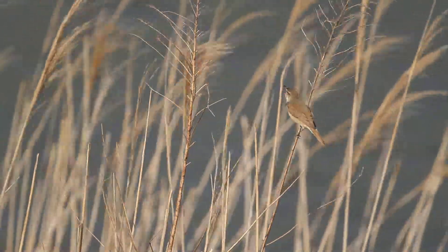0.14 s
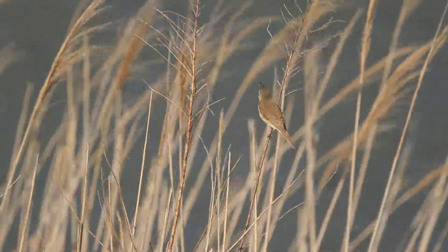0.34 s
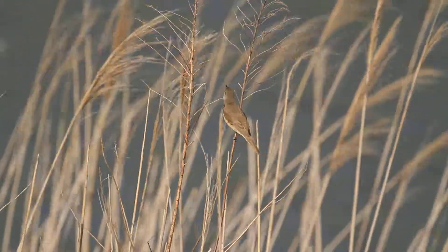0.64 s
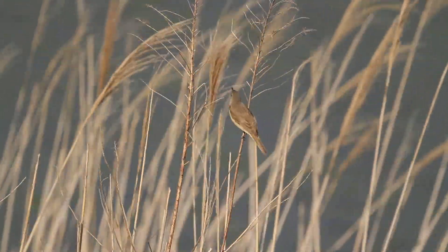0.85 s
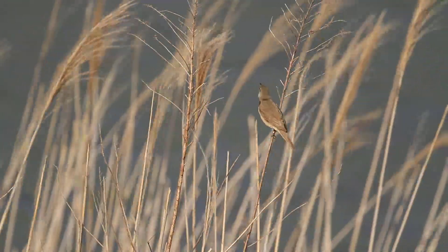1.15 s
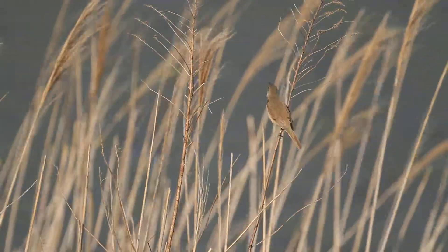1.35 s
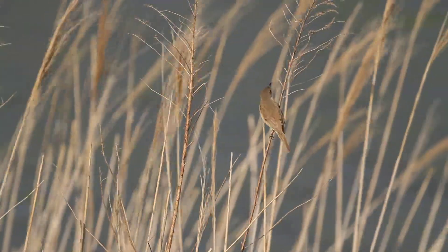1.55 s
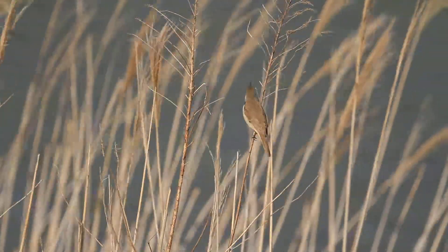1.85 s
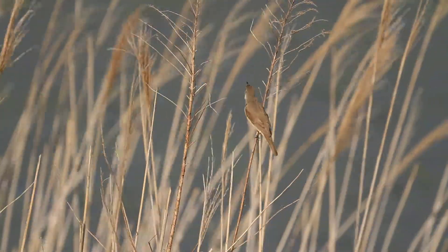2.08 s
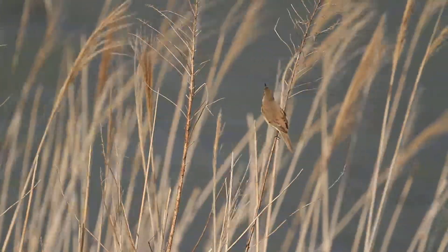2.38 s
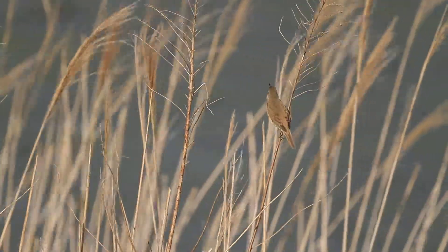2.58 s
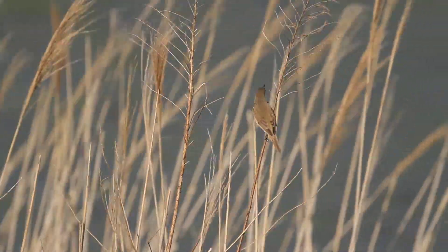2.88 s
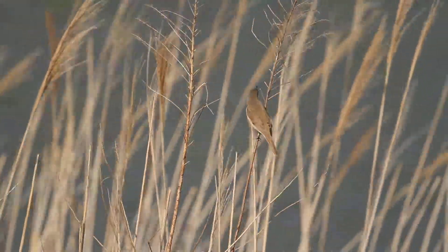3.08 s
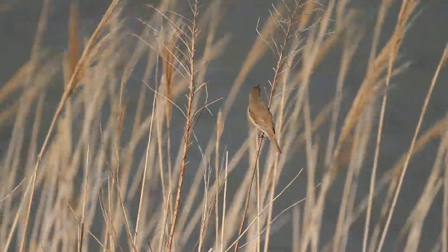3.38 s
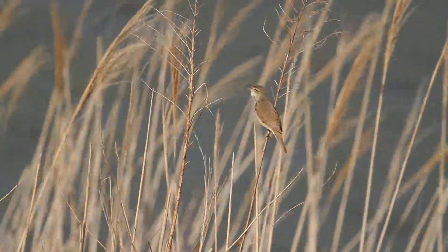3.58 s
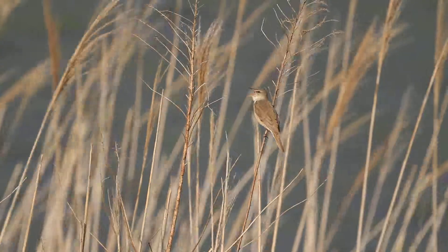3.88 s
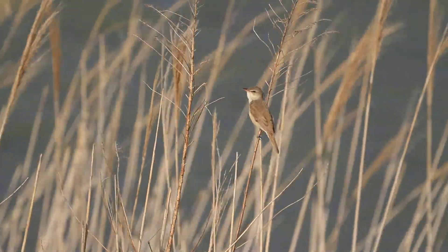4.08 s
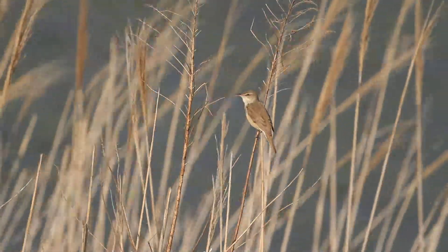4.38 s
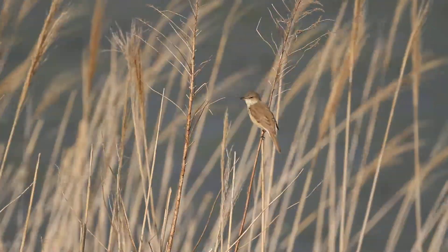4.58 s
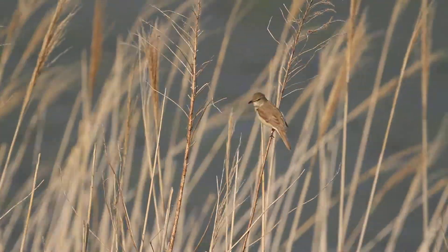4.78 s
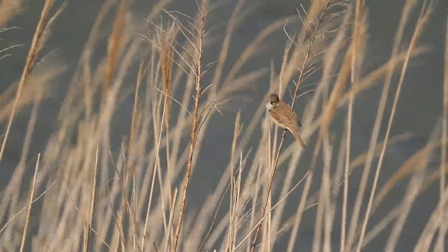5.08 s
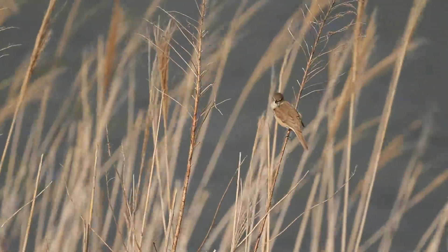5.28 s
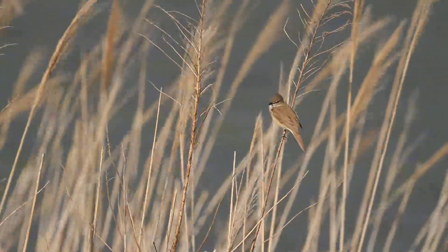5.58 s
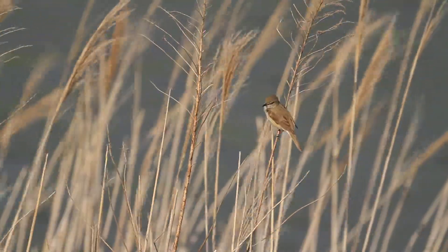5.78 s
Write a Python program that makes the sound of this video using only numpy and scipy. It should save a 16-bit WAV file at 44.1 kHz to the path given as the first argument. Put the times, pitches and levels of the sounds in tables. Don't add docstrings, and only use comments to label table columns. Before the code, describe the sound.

A reed warbler sings six quick phrases of harsh churrs, squeaky trills and rattling buzzes, then pauses as fainter birds call over soft wind.

```python
import sys
import numpy as np
from scipy import signal
from scipy.fft import rfft, irfft
from scipy.io import wavfile
from scipy.ndimage import uniform_filter1d

SR = 44100
rng = np.random.default_rng(int(sys.argv[2]) if len(sys.argv) > 2 else 0)


def volts(x):
    e = np.asarray(x, float) / 20
    return 10 ** e


def wrap_up_sound(samples):
    columns = np.atleast_2d(samples).T
    tamed = np.clip(columns, -1, 1)
    steps = np.round(tamed * 32767).astype(np.int16)
    wavfile.write(sys.argv[1], SR, steps)


N = 261954
T = np.arange(N) / SR

# start_s [s, of the throbbing half], level_db [dB], distance_blur [0-1]
CHURS = [(0.0241, -25.5, 0.14), (0.541, -24, 0), (0.673, -24.5, 0.05), (1.2252, -23.5, 0),
         (1.358, -23.5, 0.08), (1.9837, -23.5, 0), (2.1159, -21.5, 0.04), (2.7305, -23.5, 0),
         (2.8791, -23.5, 0.07), (3.5211, -24, 0.1), (3.6622, -25, 0), (3.392, -46.5, 0.1),
         (4.608, -46.5, 0.2), (4.721, -45, 0.2), (4.843, -45, 0), (5.633, -38.5, 0.2), (5.76, -40.5, 0.55),
         (5.892, -42.5, 0.56)]
# frequency_hz [Hz], gain_db [dB]
CHUR_THROAT = [(530, -64), (900, -31), (1130, -22.5), (1470, -29), (2070, -7.5), (2250, -4), (2360, 1.5),
               (2820, -2), (5440, -41.5), (7150, -34.5), (8550, -107), (9180, -40), (10700, -61.5),
               (12200, -31), (15500, -102)]
# first_high_turn_s [s], first_pitch_hz [Hz], last_pitch_hz [Hz], swing_hz [Hz], level_db [dB]
TRILLS = [
    (.1225, 5800, 6730, 850, -35),
    (.7735, 7360, 6180, 520, -36.5),
    (1.469, 6500, 6370, 460, -35.5),
    (2.2205, 6600, 6040, 630, -37.5),
    (2.9841, 5770, 6370, 800, -32.5),
    (3.779, 6670, 6340, 705, -40),
]
# start_s [s], end_s [s], level_db [dB]
RATTLES = [(.212, .246, -27), (.25, .278, -28.5), (.877, .922, -29.5), (.93, .955, -48),
           (1.568, 1.608, -30), (1.61, 1.638, -28.5), (2.327, 2.362, -32.5), (2.366, 2.397, -32),
           (3.094, 3.123, -29.5), (3.127, 3.164, -35), (3.905, 3.975, -36.5)]
# frequency_hz [Hz], gain_db [dB]
RATTLE_THROAT = [(1180, -77), (2000, -18), (2330, -20), (2770, -8.5), (2940, -9), (3580, 5), (4070, -3),
                 (5130, -4), (6750, -36), (9590, -34), (10800, -30.5), (15500, -50)]
# loudest_s [s], level_db [dB], lead_s [s before], first_beat_hz [Hz], beat_drop_s [s before]
BUZZES = [
    (0.341, -13.5, 0.066, 367.4, .031),
    (1.005, -15, 0.062, 354, 0.021),
    (1.7, -12.5, 0.064, 353.4, 0.017),
    (2.459, -14.5, 0.061, 290, 0.077),
    (3.229, -18, 0.0674, 358, 0.042),
    (4.062, -17.5, 0.081, 430, .037),
]
# top_hz [Hz], crest [share of the swell], stop_s [s after the loudest]
BUZZ_ARCHES = [(4400, .6, .008), (4350, .7, .013), (4370, .42, .006), (4340, .8, .014), (4270, .5, .011),
               (4250, .5, .005)]
# frequency_hz [Hz], gain_db [dB]
BUZZ_THROAT = [(940, -76), (1600, -36), (2190, -12), (2450, -16), (2780, -30), (3520, 1), (4380, 5),
               (4730, -13), (5880, -12.5), (6650, -23), (7110, -32), (9460, -37), (10600, -33),
               (13300, -40), (15500, -52)]
# time_s [s], overtone_gain_db [dB]
FACING = [(0, 5), (2.1, 5), (3, 10), (3.6, 3), (4.05, 10.5), (4.3, 0), (5.94, -8.5)]
# frequency_hz [Hz], gain_db [dB]
SCATTER_TREBLE = [(6500, 0), (10000, 10)]
# start_s [s], end_s [s], level_db [dB]
RASPS = [(5.06, 5.066, -43), (5.07, 5.104, -38.5), (5.117, 5.158, -41.5), (5.25, 5.296, -40),
         (5.313, 5.352, -37), (5.38, 5.43, -48), (5.53, 5.6, -53)]
# frequency_hz [Hz], gain_db [dB]
RASP_THROAT = [(1470, -43), (2500, -15), (2890, -16), (3270, -5), (3950, -8.5), (4530, -2.5), (4800, -4.5),
               (5240, -11), (6360, -23), (8000, -36), (10400, -56), (17600, -120)]
# start_s [s], length_s [s], middle_pitch_hz [Hz], glide_hz [Hz], level_db [dB]
WHISTLES = [
    (4.112, 0.12, 2905, 215, -37),
    (4.37, .12, 2853, 275, -47.5),
    (5.497, 0.061, 2770, -120, -48),
]
# start_s [s], length_s [s], middle_pitch_hz [Hz], glide_hz [Hz], level_db [dB]
HOOTS = [
    (.815, .08, 682, -6, -53),
    (4.6, .1, 702, -53, -61),
    (5.19, .145, 737, 29, -56),
    (5.37, .17, 704, -42, -57.5),
]
# start_s [s], length_s [s], middle_pitch_hz [Hz], glide_hz [Hz], level_db [dB]
HOOT_OVERTONE = [(5.19, .15, 1470, -30, -59)]
# start_s [s], length_s [s], middle_pitch_hz [Hz], glide_hz [Hz], level_db [dB]
FAR_WHISTLES = [(4.61, .048, 4830, 0, -54), (4.655, .05, 4000, -1500, -55), (4.765, .03, 3550, -420, -53),
                (4.805, .02, 3850, -370, -55), (4.83, .018, 4560, 20, -56), (4.855, .07, 4720, 80, -53.5),
                (4.93, .025, 5000, 130, -58), (5.13, .045, 6300, -2300, -57), (5.175, .025, 5450, 700, -54),
                (5.065, .045, 7600, 400, -60), (5.14, .06, 2030, 30, -60), (3.81, .065, 4190, -10, -51),
                (3.83, .13, 3590, 0, -50.5), (4.09, .1, 4180, 0, -54)]
# start_s [s], length_s [s], middle_pitch_hz [Hz], glide_hz [Hz], level_db [dB]
HOARSE_NOTES = [(4.955, .04, 5150, -100, -53), (4.258, .027, 2550, -300, -48),
                (4.25, .015, 3500, -100, -53)]
# first_high_turn_s [s], first_pitch_hz [Hz], last_pitch_hz [Hz], swing_hz [Hz], level_db [dB]
FAR_TRILL = [(5.407, 3200, 3000, 130, -46.5)]
# frequency_hz [Hz], density_db [dB per Hz]
REEDS = [(530, -26), (900, -2.5), (1450, -2.5), (1600, -3.5), (1780, -6), (2150, -3), (2610, -7.5),
         (2830, -5.5), (3960, -8.5), (5470, -12), (5740, -14.5), (10200, -17), (15600, -22.5)]
# frequency_hz [Hz], density_db [dB per Hz]
RUMBLE = [(15, -54), (25, -5), (48, -4), (92, -7), (140, 2), (198, -5.5), (263, 0.5), (340, -4.5),
          (413, -1), (533, -10), (677, -3), (900, -10.5), (1170, -56), (1980, -120)]
# start_s [s], decay_s [s], level_db [dB]
RUSTLES = [(0.39, 0.058, -55.5), (0.425, 0.024, -48.5), (0.452, 0.027, -51.5), (5.074, 0.044, -57),
           (5.553, 0.035, -63), (5.632, 0.088, -59)]
# time_s [s], level_db [dB]
HUM = [(0, -63), (1.45, -61), (1.7, -49), (2.4, -55), (3, -62), (5.94, -61)]
# start_s [s], peak_db [dB], wobble_hz [Hz]
THUMPS = [(5.143, -39, 41.5), (5.198, -38.5, 83.5), (5.22, -37, 68), (5.261, -39, 56), (5.301, -38.5, 63),
          (5.347, -46, 71), (5.385, -40.5, 63), (5.535, -42, 95), (5.571, -43, 72)]


def churs():
    out, t, order = np.zeros(N), np.arange(-2200, 2600) / SR, np.arange(-2, 22)[:, None]
    lead_s, gap_s, throb_s, release_s = 0.05, 0.011, 0.044, 0.0087
    lead = fade(t + lead_s, lead_s - gap_s, 0.03, 0.00275)
    gap = volts(-13) * (np.abs(t + gap_s / 2) < gap_s / 2)
    throbbing = volts(1.5) * fade(t + 0.00046, throb_s + release_s, 0.0015, release_s)
    shape = lead + gap + throbbing
    ramp = np.minimum(t, 2 * (throb_s + 0.0017 - t)) / 0.017
    depth = np.where(t < 0, 0.19, 0.92 * np.clip(ramp, .2, 1))
    for start, db, blur in CHURS:
        hz = 2310 + 80 * walk(149.4, size=len(t)) + 125 * walk(900, size=len(t))
        beat_hz = 570 + 90 * walk(200, size=len(t))
        source = two_voices(hz, beat_hz, order, CHUR_THROAT, blur_hz=22)
        throb = np.cos(2 * np.pi * 153.8 * (t - .002) + 0.59 * walk(67, size=len(t)))
        deep = np.clip(depth * (1 - blur), 0, 1)
        level_db = db + 2.04 * walk(400, size=len(t))
        add(out, start + t[0], source * shape * volts(level_db) * (1 - deep * (1 - throb) / 2))
    return out


def trills(table, rate, throat_hz):
    out = np.zeros(N)
    swings, sag, dip = 6.2, .06, 1.1
    for turn, first_hz, last_hz, swing_hz, db in table:
        t = np.arange(-.6 / rate, (swings - .6) / rate, 1 / SR)
        u = np.linspace(0, 1, len(t))
        swing = np.cos(2 * np.pi * rate * t)
        narrow_dips = swing - dip * np.minimum(swing, 0) ** 2
        wide_hz = swing_hz * np.interp(u, [0, .6, 1], [.3, 1, 0])
        path_hz = first_hz + (last_hz - first_hz) * u - sag * throat_hz * np.sin(np.pi * u)
        hz = path_hz + wide_hz * narrow_dips + 60 * walk(500, size=len(t))
        swell_db = np.interp(u, [0, .55, 1], [-4, 0, -9])
        throat_db = -10 * np.log10(1 + ((hz / throat_hz - 1) / .058) ** 2)
        level_db = db + swell_db + 3.5 + throat_db + 2.5 * walk(308, size=len(t))
        note = tone(hz, -36 - throat_db) * volts(level_db)
        add(out, turn + t[0], note * fade(t - t[0], t[-1] - t[0], .004, .005))
    return out


def rattles(table, throat, rate, breath, rise):
    out, t = np.zeros(N), T[:4400]
    for start, end, db in table:
        source = clicks(rate, .17, 2.0, len(t))
        source = source + breath * np.clip(t / 0.066, 0, 1) * rng.standard_normal(len(t))
        length = end - start + 1 / rate
        shape = fade(t, length, rise * length, 0.036 * length)
        add(out, start - 1 / rate, unit(colour(source, throat)) * volts(db) * shape)
    return out


def buzzes():
    out, t = np.zeros(N), np.arange(-4400, 1400) / SR
    overtone, order = (v.reshape(-1, 1) for v in np.mgrid[2:8, -5:2])
    for (peak, db, length, beat_hz, drop), (top_hz, crest, stop) in zip(BUZZES, BUZZ_ARCHES):
        voice_hz = top_hz - 560 * (np.clip(1 + t / length, 0, 1) - crest) ** 2
        throat = np.interp(t, [stop - .012, stop, stop + .012], [1, .94, .8])
        beat = np.interp(t, [-length, -drop - .003, -drop + 0.0015, 0],
                         [1.04 * beat_hz, min(346.6, beat_hz), 308.2, 288])
        rough = np.interp(t, [-length, -.7 * length, -.03, -.005], [1.6, .8, .9, 2.2])
        hz = voice_hz * throat + 10 * walk(300, size=len(t))
        beat = beat + 4 * rough * walk(400, size=len(t))
        weak_db = np.where(order % 2, np.interp(t, [-drop, 0], [-7, -3]), 0)
        swell_s = [-length - .012, -length, -length + 0.0092, -.3 * length, 0, stop, stop + 0.022]
        swell_db = np.interp(t, swell_s, [-29.5, -14.5, -11.0, -5, -3, -4.5, -53])
        push_db = np.where(overtone > 3, .5 * np.maximum(swell_db, -16) + 3, 0)
        blur_hz = 2.4 * rough * (overtone - 1) ** 1.5
        voice = two_voices(hz * overtone / 2, beat, order, BUZZ_THROAT, blur_hz, throat, weak_db + push_db)
        voice = voice + volts(-31.0) * (tone(hz / 2, -40) + tone(hz / 2 - beat, -40))
        level_db = db + swell_db + 0.31 * rough * walk(350, size=len(t))
        add(out, peak + t[0], voice * volts(level_db))
    return out


def two_voices(hz, beat_hz, order, throat, blur_hz, shift=1, extra_db=0):
    wander = np.array([walk(700, size=len(beat_hz)) for _ in order])
    lines_hz = hz + order * beat_hz + blur_hz * np.clip(order ** 2, 1, 50) * wander
    phase = 2 * np.pi * (np.cumsum(lines_hz, axis=1) / SR + rng.random(order.shape))
    gain = uniform_filter1d(gain_at(lines_hz / shift, throat), size=150, axis=1)
    voice = np.sum(gain * volts(extra_db) * np.sin(phase), axis=0)
    return voice / np.sqrt(uniform_filter1d(voice ** 2, size=400))


def facing(song):
    high_pass = signal.butter(4, 7600, "high", fs=SR, output="sos")
    overtones = signal.sosfiltfilt(high_pass, song)
    return song + (volts(np.interp(T, *np.transpose(FACING))) - 1) * overtones


def whistles(table, second_db, flutter_db, shake_hz, arch):
    out = np.zeros(N)
    for start, length, middle_hz, glide_hz, db in table:
        u = np.linspace(-1, 1, int(length * SR))
        hz = middle_hz * (1 - arch * u ** 2) + glide_hz / 2 * u
        level = volts(db + 3.5 * u + flutter_db * walk(150, size=len(u))) * fade(u + 1, 2, .25, .15)
        add(out, start, tone(hz + shake_hz * walk(600, size=len(u)), second_db) * level)
    return out


def space(x):
    t = T[:SR]
    near, late, bank = rng.standard_normal((3, SR))
    near_t60_s, late_t60_s, bank_s, smear_s = .13, .6, .24, .022
    response = volts(-9.5) * near * volts(-60 * t / near_t60_s) / np.sqrt(near_t60_s * SR / np.log(1e6))
    response += volts(-27.5) * late * volts(-60 * t / late_t60_s) / np.sqrt(late_t60_s * SR / np.log(1e6))
    response += volts(-30) * bank * np.exp(-((t - bank_s) / smear_s) ** 2) / np.sqrt(smear_s * SR)
    scattered = signal.fftconvolve(x, response * np.clip(t / 0.0066, 0, 1))[:N]
    return x + colour(scattered, SCATTER_TREBLE)


def reeds():
    hiss = unit(colour(rng.standard_normal(N), REEDS)) * volts(-50 + .5 * walk(0.98))
    rumble = unit(colour(rng.standard_normal(N), RUMBLE, size=16384)) * volts(-53.5)
    brush = np.zeros(N)
    for start, length, db in RUSTLES:
        t = np.arange(int(2 * length * SR)) / SR
        level = volts(db + 2.2 * walk(600, size=len(t))) * np.exp(-t / length)
        add(brush, start, rng.standard_normal(len(t)) * level)
    brush = colour(brush, [(1500, 5.5), (5000, 13), (8000, 6), (11000, 12.5), (15500, 1)])
    hum_db = np.interp(T, *np.transpose(HUM)) - 5.5 + 0.83 * walk(10) + 1.5 * walk(4)
    hum = tone(58 + 7.5 * walk(22), -25) * volts(hum_db)
    return hiss + rumble + brush + hum


def thumps():
    out, t = np.zeros(N), T[:8000]
    for start, db, hz in THUMPS:
        wobble = tone(hz * (1 + 0.144 * walk(37, size=len(t))), -9) / np.sqrt(2)
        add(out, start, volts(db) * wobble * (t / 0.015) * np.exp(1 - t / 0.014))
    return out


def tone(hz, second_db):
    phase = 2 * np.pi * np.cumsum(hz) / SR
    return np.sqrt(2) * (np.sin(phase) + volts(second_db) * np.sin(2 * phase))


def clicks(rate, jitter, scatter_db, size):
    chance = rng.standard_normal((200, 2))
    at = np.cumsum(SR / rate * np.clip(1 + jitter * chance[:, 0], .3, 3))
    keep = at < size - 1
    at, gain = at[keep], volts(scatter_db * chance[keep, 1])
    i = at.astype(int)
    later = at - i
    return np.bincount(i, gain * (1 - later), size) + np.bincount(i + 1, gain * later, size)


def walk(rate, size=N):
    k = max(int(SR / rate), 1)
    held = np.repeat(rng.standard_normal(size // k + 1), k)
    return 1.4 * uniform_filter1d(uniform_filter1d(held, k), k)[:size]


def fade(t, length, rise, fall):
    return np.clip(t / rise, 0, 1) ** 2 * np.clip((length - t) / fall, 0, 1) ** 2


def gain_at(hz, table):
    f, db = np.transpose(table)
    return volts(np.interp(np.log(np.maximum(hz, 1)), np.log(f), db))


def colour(x, table, size=4096):
    cepstrum = irfft(np.log(gain_at(np.arange(size // 2 + 1) * SR / size, table)))
    cepstrum[1:size // 2] *= 2
    cepstrum[size // 2 + 1:] = 0
    return signal.fftconvolve(x, irfft(np.exp(rfft(cepstrum))))[:len(x)]


def unit(x):
    return x / np.sqrt(np.mean(x ** 2))


def add(out, s, x):
    i = int(round(s * SR))
    x = x[max(-i, 0):N - i]
    out[max(i, 0):max(i, 0) + len(x)] += x


def scene():
    song = churs() + trills(TRILLS, rate=120, throat_hz=5730) + buzzes()
    song += rattles(RATTLES, RATTLE_THROAT, rate=330, breath=0.27, rise=0.056)
    others = rattles(RASPS, RASP_THROAT, rate=650, breath=0.19, rise=0.063)
    others += whistles(WHISTLES, second_db=-33, flutter_db=0.57, shake_hz=23, arch=0.031)
    others += whistles(HOOTS + HOOT_OVERTONE, second_db=-22, flutter_db=0.39, shake_hz=2.8, arch=0.035)
    others += whistles(FAR_WHISTLES, second_db=-36, flutter_db=2.2, shake_hz=77, arch=0.0042)
    others += trills(FAR_TRILL, rate=57.0, throat_hz=3030)
    others += whistles(HOARSE_NOTES, second_db=-40, flutter_db=3.5, shake_hz=230, arch=0.)
    return (space(facing(song) + others) + reeds() + thumps())[None]


def roll_off(x):
    return signal.sosfilt(signal.butter(12, 15800, fs=SR, output="sos"), x)


def record(dry):
    low_pass = signal.ellip(10, .2, 70, 15780, fs=SR, output="sos")
    mix = signal.sosfilt(low_pass, dry)
    return roll_off(mix)


dry = scene()
out = record(dry)
wrap_up_sound(out)
```